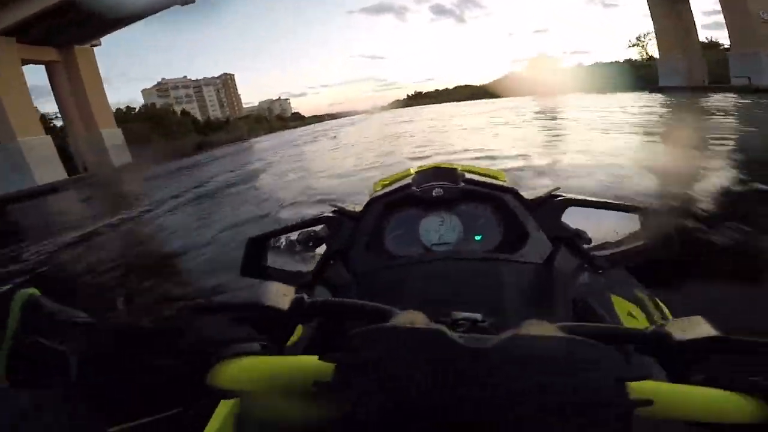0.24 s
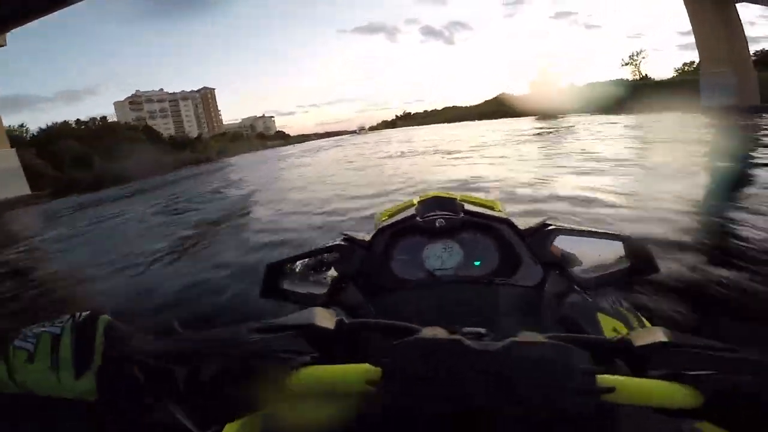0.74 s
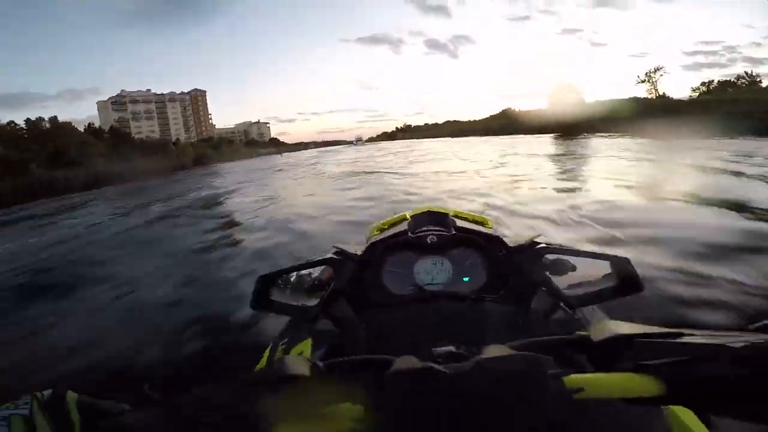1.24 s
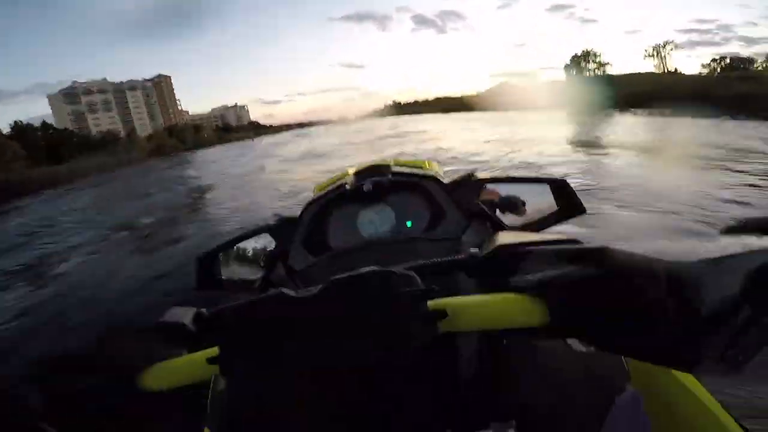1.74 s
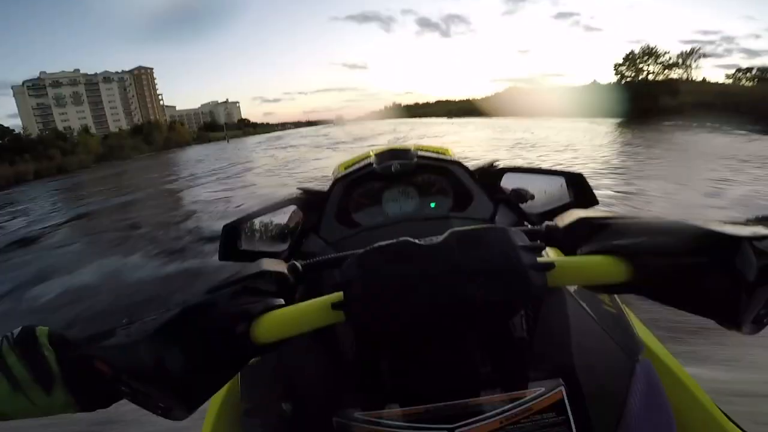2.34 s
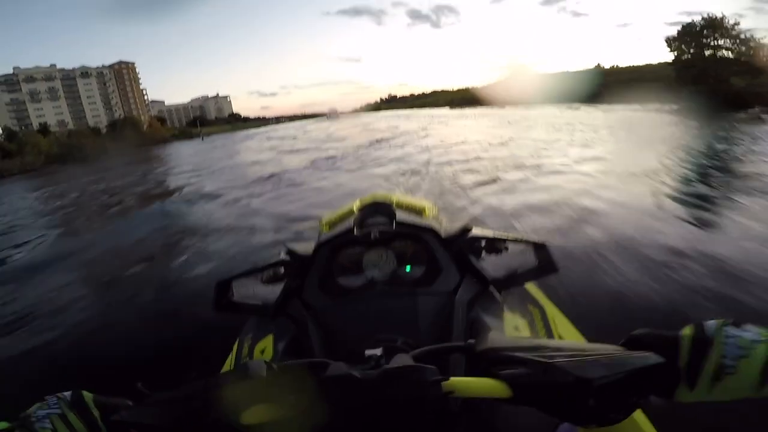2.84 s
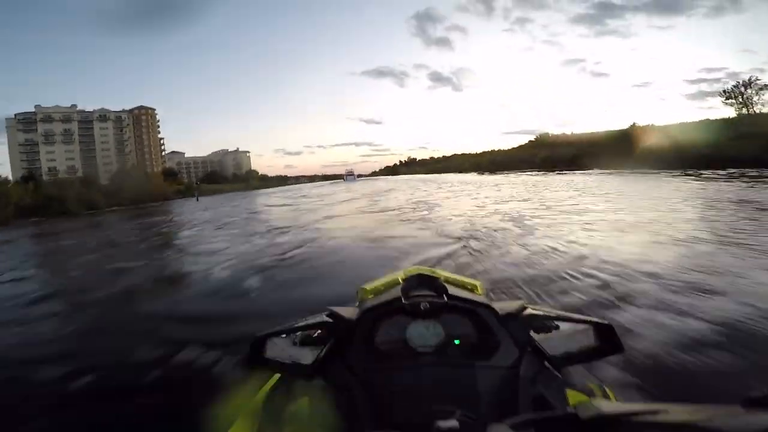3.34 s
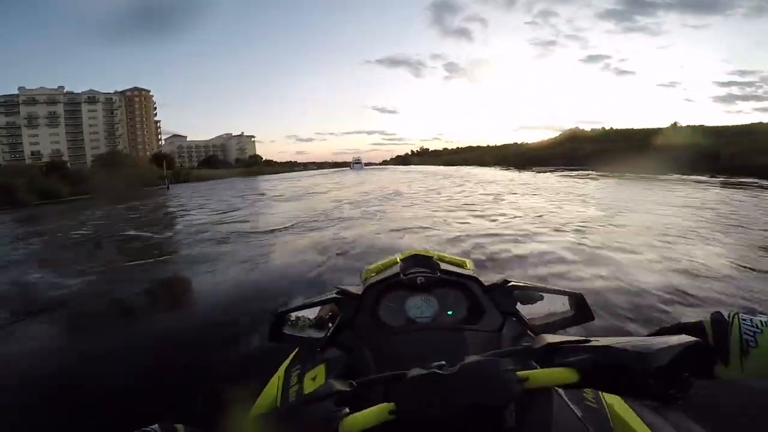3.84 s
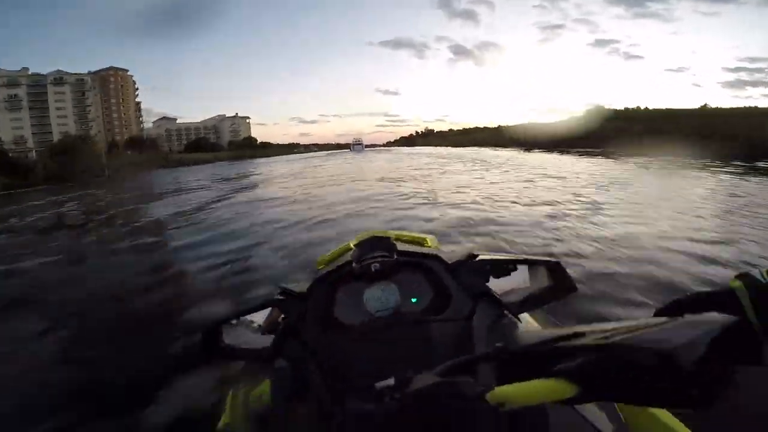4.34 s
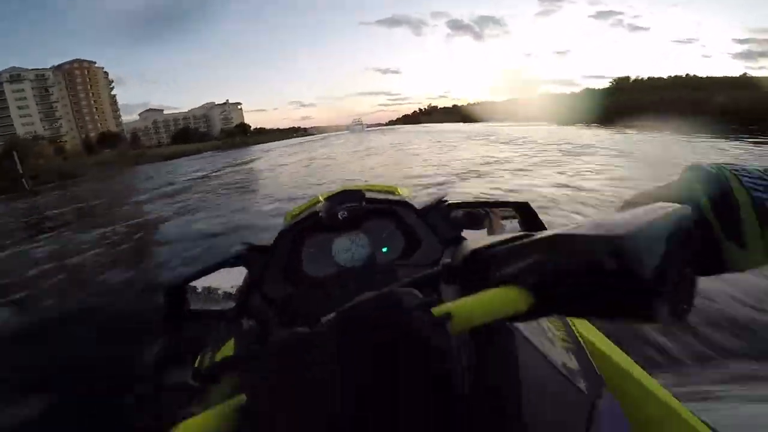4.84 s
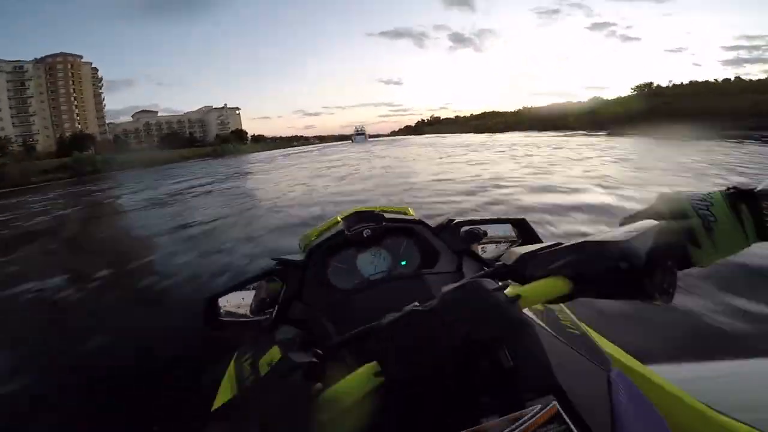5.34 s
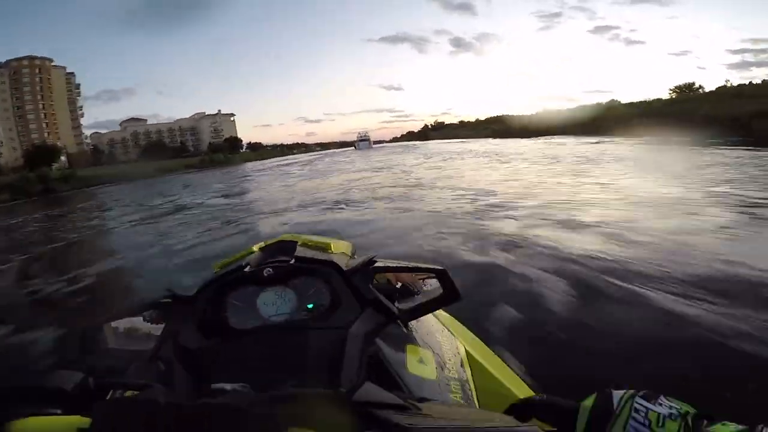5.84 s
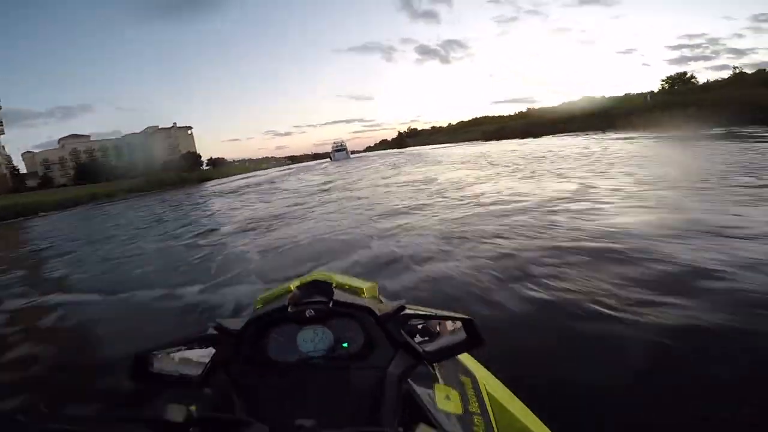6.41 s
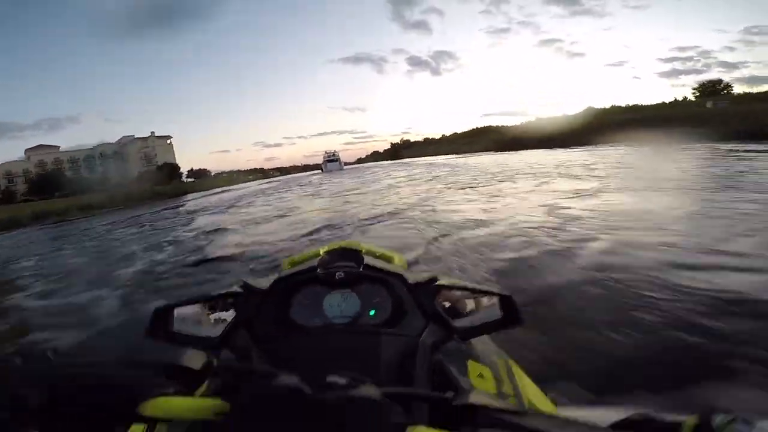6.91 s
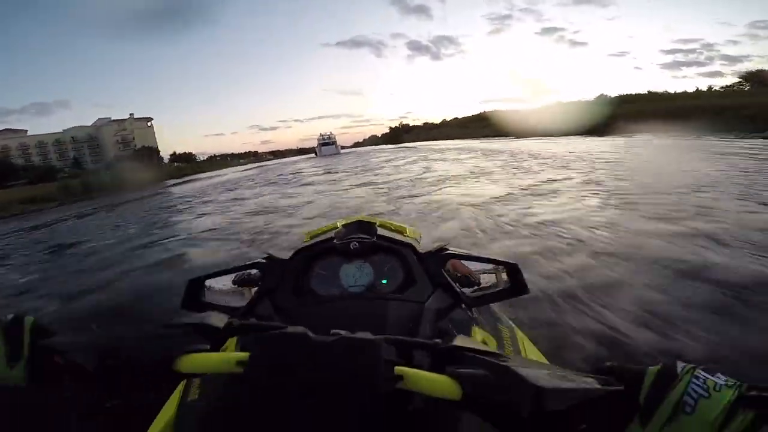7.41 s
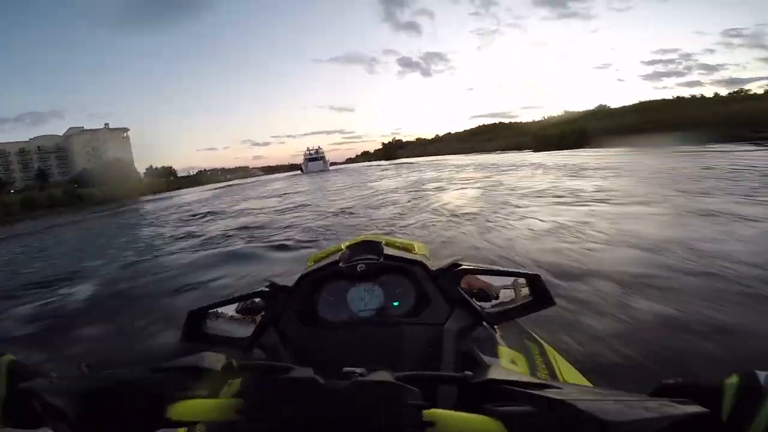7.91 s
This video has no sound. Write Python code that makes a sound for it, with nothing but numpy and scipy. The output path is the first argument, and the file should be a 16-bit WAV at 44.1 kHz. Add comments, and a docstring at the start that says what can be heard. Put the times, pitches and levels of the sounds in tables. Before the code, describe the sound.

A personal watercraft engine pulses rapidly up and down with a thin high whine, over buffeting wind, hissing spray and hull slaps on choppy water.

```python
"""On a river, at the rider's chest on a planing personal watercraft, with a camera's microphone in the head wind.
The three-cylinder engine pulses up and down at once; after 1.6 s drops tick on the camera case and the hull slaps.
It flares near 2.6 s, sinks by 3 s, drives on through more slaps, sinks again near 6.4 s, then surges to the end.
Throughout, firing pulses ring pipe and intake, sines make the exhaust note and the supercharger's whine,
and shaped noise makes roar, drumming hull, spray and wind; passing waves muffle or free the exhaust."""
import sys
import numpy as np
from scipy import signal
from scipy.fft import rfft, irfft, next_fast_len
from scipy.io import wavfile
from scipy.ndimage import uniform_filter1d, minimum_filter1d, map_coordinates

SR = 44100
rng = np.random.default_rng(int(sys.argv[2]) if len(sys.argv) > 2 else 0)


def int16_out(signal):
    """Quantize to a 16-bit WAV file."""
    q = np.round(np.clip(np.atleast_2d(signal).T, -1, 1) * 32767)
    wavfile.write(sys.argv[1], SR, q.astype(np.int16))


N = 360297  # samples


def amp(db):
    """Decibels to gain."""
    return 10 ** (np.asarray(db) / 20)


def unit(x):
    """Scaled to rms 1."""
    return x / np.sqrt(np.mean(x ** 2) + 1e-20)


def curve(rows):
    """One value per sample, on straight lines through (t/s, value) rows."""
    times, values = np.transpose(rows)
    return np.interp(np.arange(N) / SR, times, values)


def glide(rows):
    """One value per sample on a smooth path through (t/s, value) rows, level at every turning point."""
    times, values = np.transpose(rows)
    spans = np.diff(times)
    step = np.diff(values) / spans
    # harmonic mean of the neighbouring slopes, or zero where they change sign
    both = step[:-1] * step[1:]
    inner = 2 * np.maximum(both, 0) / np.where(both > 0, step[:-1] + step[1:], 1)
    slope = np.pad(inner, 1)
    t = np.arange(N) / SR
    i = np.clip(np.searchsorted(times, t) - 1, 0, len(step) - 1)
    since = t - times[i]
    u = since / spans[i]
    bend = (1 - u) * ((slope[i] - step[i]) * (1 - u) - (slope[i + 1] - step[i]) * u)
    return values[i] + since * (step[i] + bend)


def wobble(rate):
    """A smooth random curve, rate knots a second."""
    knots = rng.standard_normal(int(N * rate / SR) + 4)
    return map_coordinates(knots, [np.arange(N) * rate / SR])


def filtered(x, response):
    """x times a complex response of frequency."""
    size = next_fast_len(N + SR // 2)
    spectrum = rfft(x, size) * response(np.fft.rfftfreq(size, 1 / SR))
    return irfft(spectrum, size)[:N]


def coloured(x, spectrum):
    """x through (f/Hz, level/dB) points read on a log axis."""
    f, db = np.transpose(spectrum)
    return filtered(x, lambda hz: amp(np.interp(np.log(hz + 1), np.log(f), db)))


def noise(spectrum):
    """Coloured noise of rms 1."""
    return unit(coloured(rng.standard_normal(N), spectrum))


def resonate(x, modes, muffle_hz):
    """x rings (f/Hz, width/Hz, level/dB) resonances under a hood that muffles the treble; rms 1."""
    def body(f):
        return sum(amp(db) * 1j * f * width / (centre * centre - f * f + 1j * f * width)
                   for centre, width, db in modes)

    hood = signal.butter(4, muffle_hz, fs=SR, output="sos")
    return unit(signal.sosfilt(hood, filtered(x, body)))


# gusts on the microphone: [t/s, level/dB before trim]
GUSTS = [(0, -30.5), (.45, -24), (.6, -28.5), (1.05, -38), (1.5, -25), (1.77, -24.5), (2.07, -25.5),
         (2.3, -31), (2.64, -20), (2.78, -49), (2.92, -31), (3.3, -25.5), (4.03, -30.5), (4.15, -22),
         (4.4, -18), (4.52, -36.5), (4.75, -24), (5.4, -19), (5.8, -31), (6.05, -24), (6.45, -26),
         (7.1, -22), (7.65, -19.5), (7.92, -35), (8.17, -21)]
# spectrum of the wind: [f/Hz, relative level/dB]
WIND_SPECTRUM = [(10, -10), (25, -8), (45, 1), (70, 3), (100, 3.5), (200, -18), (600, -65.5), (5000, -110)]


def wind(trim_db, lumps_db):
    """The head wind tumbles over the microphone as low, lumpy noise."""
    return amp(curve(GUSTS) + trim_db + lumps_db * wobble(12)) * noise(WIND_SPECTRUM)


CRUISE_RATE = 170  # firings per second
# how hard the pump pulls on the engine: [t/s, load/dB]
PUMP_LOAD = [(0, 0), (1.2, 4.5), (1.5, 1), (1.78, 5.5), (1.93, 1.5), (2.02, -5.5), (2.15, -1), (2.28, 1.5),
             (2.44, 2.5), (2.7, -9.5), (2.8, -11), (3.2, -10), (3.7, -5), (4.2, 3.5), (4.6, 1), (4.85, 6),
             (5.18, 2), (5.4, 6.5), (5.9, 1.5), (6.7, -11.5), (6.98, -8.5), (7.05, 0.5), (7.2, -7.5),
             (7.54, 0.5), (7.7, -2), (7.9, 2), (8.17, -2.5)]


def level(law, rate):
    """A layer's level in dB, from the engine's speed and load."""
    cruise_db, per_octave, per_load = law
    return cruise_db + per_octave * np.log2(rate / CRUISE_RATE) + per_load * curve(PUMP_LOAD)


def puffs(count, depth):
    """Turbulence that swells once per firing; rms 1."""
    swell = 1 + depth * np.cos(2 * np.pi * count)
    return unit(rng.standard_normal(N) * swell)


# spectrum of the drumming hull: [f/Hz, relative level/dB]
HULL_SPECTRUM = [(30, -31.5), (80, -18), (120, 5.5), (210, 5.5), (300, -8.5), (420, -4.5), (600, -11),
                 (1200, -70), (5000, -100)]
# law of the drumming: [level/dB at cruise, dB per octave of speed, dB per dB of load]
HULL_LAW = (-18, 0, .55)


def hull(rate, gust_share):
    """Chop drums on the hull as low noise, harder in the gusts and under load."""
    gusts = curve(GUSTS)
    gust_db = gust_share * (gusts - gusts.mean())
    return amp(level(HULL_LAW, rate) + gust_db + 1.07 * wobble(9)) * noise(HULL_SPECTRUM)


# level of the treble, also followed by the whine: [t/s, level/dB]
TREBLE_LEVEL = [(0, -36.5), (.16, -45.5), (.3, -39), (.85, -36), (1.05, -40), (1.22, -37), (1.45, -44),
                (1.66, -33.5), (1.85, -36), (2.11, -34.5), (2.55, -38), (2.71, -29.5), (2.85, -43),
                (3.2, -49), (3.5, -43), (3.95, -42.5), (4.3, -36.5), (4.55, -41), (4.72, -37),
                (4.88, -37.5), (5.2, -40.5), (5.45, -35.5), (5.84, -42), (6.02, -40.5), (6.35, -49.5),
                (7.1, -48), (7.55, -40.5), (7.88, -39.5), (8.17, -45.5)]
# spectrum of the spray: [f/Hz, relative level/dB]
SPRAY_SPECTRUM = [(1000, -14), (2500, -8), (3400, -17.5), (4000, -10), (4500, -5), (5200, -3), (5900, -2),
                  (6400, -7.5), (7000, -18.5), (8500, -21.5), (10000, -32), (12500, -42), (15000, -58.5)]


def spray(count, throb):
    """Water thrown aside hisses along the hull, throbbing slightly once per firing."""
    hiss = unit(coloured(puffs(count, depth=throb), SPRAY_SPECTRUM))
    return amp(curve(TREBLE_LEVEL) + 1.1 * wobble(100)) * hiss


def bursts(events, spectrum, rise, t60):
    """Coloured noise bursts at (t/s, level/dB) rows; rise and 60 dB decay in seconds."""
    t = np.arange(SR // 4) / SR
    shape = (1 - np.exp(-t / rise)) * amp(-60 * t / t60)
    envelope = np.zeros(N + SR)
    for start, db in events:
        envelope[round(start * SR):][:len(t)] += amp(db) * shape / shape.max()
    return envelope[:N] * noise(spectrum)


# drops on the camera case: [t/s, level/dB before trim]
CASE_DROPS = [(1.615, -33.5), (2.114, -31.5), (2.244, -19.5), (2.514, -31), (6.044, -34.5)]
# the camera case rings in the treble: [f/Hz, relative level/dB]
CASE_SPECTRUM = [(2000, -27.5), (3500, -14), (4500, -1), (6000, 2.5), (7000, -11), (9000, -6),
                 (12000, -16.5), (15000, -24)]


def drops(trim_db):
    """Drops hit the case at the microphone: very short clicks of treble noise."""
    return amp(trim_db) * bursts(CASE_DROPS, CASE_SPECTRUM, rise=.0002, t60=0.011)


# the hull slaps a wave: [t/s, level/dB]
HULL_SLAPS = [(2.115, -48), (2.505, -25), (4.633, -31.5), (5.658, -23), (6.095, -22.5), (7.885, -22)]
# spectrum shared by the slaps and the engine roar: [f/Hz, relative level/dB]
ROAR_SPECTRUM = [(150, -29), (330, 3.5), (450, -6), (650, -5.5), (900, -7.5), (1300, -14), (1900, -19),
                 (2500, -34.5), (3400, -37.5), (6000, -54.5), (12000, -83.5)]


def slaps():
    """The hull meets a wave: a short noise burst with the colour of the roar."""
    return bursts(HULL_SLAPS, ROAR_SPECTRUM, rise=0.0013, t60=0.15)


# the blade tone by engine speed: [firings per second, level/dB before trim and case]
WHINE_BY_SPEED = [(110, -57), (135, -47), (152, -41), (168, -38), (183, -34.5), (196, -38.5), (212, -34.5)]
WHINE_FOLLOWS = 0.88  # dB per dB of treble


def supercharger(rate, count, whine_db, octave_db, blur, shake):
    """The geared impeller sings far above the firings; torsional shake smears its line."""
    blades_per_firing = 30.9
    cycle = 2 * np.pi * count / 3  # once per three firings
    angle = 2 * np.pi * blades_per_firing * count
    angle += blur * wobble(330) + shake * np.sin(cycle + wobble(20))
    treble = curve(TREBLE_LEVEL)
    speed_db = np.interp(rate, *np.transpose(WHINE_BY_SPEED))
    sung_db = speed_db + WHINE_FOLLOWS * (treble - treble.mean())
    tone = amp(sung_db + whine_db + 2.9 * wobble(24) + 3.88 * wobble(150)) * np.sin(angle)
    octave = amp(treble + octave_db + 2 * wobble(47)) * np.sin(2 * angle)
    # the whine swells as it climbs into the resonance of the case
    return np.sqrt(2) * coloured(tone + octave, CASE_SPECTRUM)


def pulses(count, uneven, scatter, jitter):
    """One pulse per firing; one cylinder of three differs, and so does every combustion; rms 1."""
    at = np.flatnonzero(np.diff(np.floor(count + jitter * wobble(120))) > 0)
    cylinder = np.cos(2 * np.pi * np.arange(len(at)) / 3)
    train = np.zeros(N)
    train[at] = 1 + uneven * cylinder + scatter * rng.standard_normal(len(at))
    return unit(train)


# laws of roar and rasp: [level/dB at cruise before trim, dB per octave of speed, dB per dB of load]
ENGINE_ROAR_LAW = (-33, 5.3, 0.75)
PIPE_RASP_LAW = (-34.5, 12, 1.17)
# resonances of the exhaust system: [f/Hz, width/Hz, relative level/dB]
PIPE_MODES = [(502.7, 17, 2.5), (709, 47, -2), (1038, 190, -3.5)]
# resonances of the intake: [f/Hz, width/Hz, relative level/dB]
INTAKE_MODES = [(501.6, 11, 9), (1428, 64, -1.5), (1763, 25, 3.5), (2810, 58, -7)]
# the intake rings when the throttle is open: [t/s, level/dB before trim]
THROTTLE_LEVEL = [(0, -37.5), (1.3, -39), (1.5, -42), (1.8, -33.5), (2.1, -41.5), (2.7, -39), (2.92, -57),
                  (3.2, -58), (3.5, -44), (3.85, -43.5), (4.05, -45.5), (4.4, -40), (5.6, -42.5),
                  (6.1, -58), (6.8, -58.5), (7.6, -52.5), (8.17, -46)]


def engine_bay(rate, count, roar_db, intake_db, breath):
    """Firing pulses and their turbulence ring the pipe and the intake, over a broad roar."""
    knocks = pulses(count, uneven=.5, scatter=0.25, jitter=0.008)
    roar = unit(coloured(puffs(count, depth=0.13), ROAR_SPECTRUM))
    roar *= amp(level(ENGINE_ROAR_LAW, rate) + roar_db + 1.8 * wobble(26))
    # the resonances of the pipe are met twice on the way out
    header = resonate(knocks + breath * puffs(count, depth=.5), PIPE_MODES, muffle_hz=1810)
    pipe = resonate(header, PIPE_MODES, muffle_hz=1860)
    pipe *= amp(level(PIPE_RASP_LAW, rate) + 0.33 * wobble(18))
    intake = resonate(knocks + puffs(count, depth=0.54), INTAKE_MODES, muffle_hz=3020)
    return roar + pipe + amp(curve(THROTTLE_LEVEL) + intake_db) * intake


# the firing note by engine speed: [firings per second, level/dB before trim]
BOOM_BY_SPEED = [(110, -9.5), (135, -9), (155, -8.5), (172, -11), (184, -13), (198, -9.5), (212, -10)]
BOOM_RISE_DB = 0.13  # per octave a second of run-up
# waves cover the exhaust and muffle its note, or drop away and free it: [t/s, length/s, change/dB]
EXHAUST_WAVES = [(0.077, 0.18, 2.5), (0.24, .06, -6), (0.514, 0.12, -7.5), (.66, 0.16, -2.5),
                 (0.783, .08, -4), (1.127, 0.059, -12), (1.43, 0.048, -4), (1.735, 0.25, -21.5),
                 (2.06, 0.16, 2), (2.363, .12, -16), (2.768, .13, 10), (2.883, 0.082, -16),
                 (3.13, 0.075, -8), (3.254, 0.084, -9), (3.41, 0.17, -6), (3.812, 0.032, -3.5),
                 (4.227, 0.24, -12.5), (4.733, 0.057, -11), (5.04, 0.055, -9), (5.209, 0.36, -11),
                 (7.116, 0.083, -10), (7.273, 0.17, -15), (7.53, 0.22, -21), (8.16, 0.16, -2.5)]


def boom_level(rate):
    """The firing note in dB: set by speed, stronger on a run-up, muffled or freed by each wave."""
    t = np.arange(N) / SR
    run_up = np.maximum(np.gradient(np.log2(rate)) * SR, 0)
    waves = sum(db * np.exp(-(2 * (t - s) / length) ** 2) for s, length, db in EXHAUST_WAVES)
    return np.interp(rate, *np.transpose(BOOM_BY_SPEED)) + BOOM_RISE_DB * run_up + waves


# the exhaust's octave: [t/s, level/dB]
BARK_LEVEL = [(0, -18), (.35, -25.5), (.78, -29.5), (.92, -19), (1.1, -19), (1.27, -15.5), (1.63, -21),
              (1.71, -21.5), (1.97, -15), (2.02, -26), (2.1, -22.5), (2.14, -18.5), (2.21, -27.5),
              (2.4, -26.5), (2.54, -20), (2.66, -27), (2.78, -49), (2.92, -24), (3.33, -38.5), (3.5, -26),
              (4.05, -32.5), (4.4, -18), (4.8, -20), (5.08, -13), (5.55, -13.5), (5.88, -20), (6.02, -29.5),
              (7.08, -32.5), (7.28, -23), (7.6, -15), (7.95, -26)]


def exhaust(rate, count, boom_db, thirds_db, rough_db):
    """A strong firing note and its octave; unequal cylinders put weak tones at thirds around them."""
    angle = 2 * np.pi * count
    boom = amp(boom_level(rate) + boom_db + 0.28 * wobble(60)) * np.sin(angle)
    waver = .3 * wobble(30) + wobble(3)
    bark = amp(curve(BARK_LEVEL) + rough_db * wobble(60)) * np.cos(2 * angle + waver)
    ratios = np.array([2, 4, 5, 7, 8]) / 3  # of the firing note
    thirds = sum(amp(7 * wobble(10)) * np.sin(k * angle + 2.0 * wobble(16)) for k in ratios)
    thirds *= amp(level(ENGINE_ROAR_LAW, rate) + thirds_db)
    return np.sqrt(2) * (boom + bark + thirds)


def firings(rate, flutter):
    """Firings counted since the start; the shaft flutters as the pump bites."""
    return np.cumsum(rate * (1 + flutter * wobble(35))) / SR


# speed of the engine, which flares when the pump leaves the water: [t/s, firings per second]
ENGINE_SPEED = [(-.1, 190), (.15, 151), (.39, 193), (.64, 157), (.85, 193), (1.03, 154), (1.22, 191),
                (1.44, 122), (1.6, 167), (1.85, 200), (1.91, 194), (1.96, 211), (2.1, 190), (2.17, 159),
                (2.43, 198), (2.5, 185), (2.58, 213), (2.78, 158), (2.86, 142), (2.96, 108), (3.12, 161),
                (3.35, 198), (3.55, 197), (3.76, 201), (4.03, 128), (4.31, 189), (4.58, 145), (4.84, 188),
                (4.98, 175), (5.22, 164), (5.49, 193), (5.7, 159), (5.95, 140), (6.37, 115), (6.61, 148),
                (6.76, 135), (7.02, 144), (7.21, 180), (7.38, 160), (7.57, 185), (7.93, 121), (8.2, 175)]


def scene():
    """Wind, water and engine at the rider's chest."""
    rate = glide(ENGINE_SPEED)
    count = firings(rate, flutter=.003)
    air = wind(trim_db=1, lumps_db=0.4)
    river = hull(rate, gust_share=0.083) + spray(count, throb=0.11)
    hits = drops(trim_db=-9.5) + slaps()
    engine = supercharger(rate, count, whine_db=-4.5, octave_db=-15.0, blur=1.0, shake=0.55)
    engine += engine_bay(rate, count, roar_db=3.0, intake_db=2.5, breath=0.13)
    engine += exhaust(rate, count, boom_db=0.63, thirds_db=-8.5, rough_db=2.5)
    return (air + river + hits + engine)[None]


TOP_HZ = 15300  # the camera's band limit


def record(dry):
    """The camera's limiter holds the peaks under full scale; nothing passes above its band limit."""
    ceiling = .93
    needed = np.minimum(1, ceiling / (np.abs(dry[0]) + 1e-9))
    held = minimum_filter1d(needed, size=441)  # 10 ms
    gain = uniform_filter1d(held, size=441)
    return filtered(dry[0] * gain, lambda hz: hz < TOP_HZ)[None]


dry = scene()
out = record(dry)
int16_out(out)
```